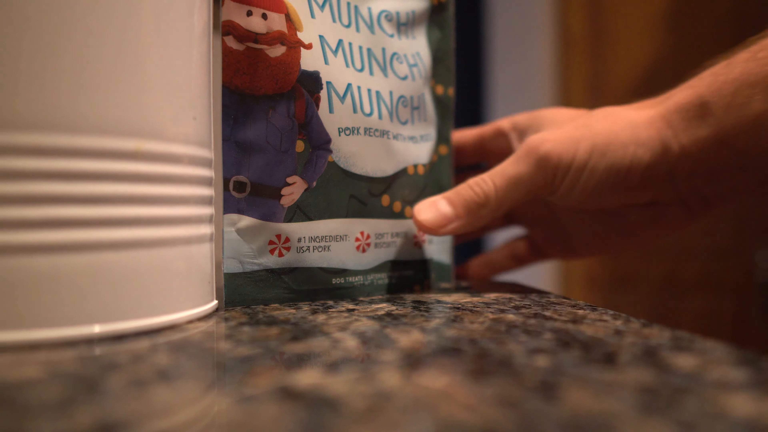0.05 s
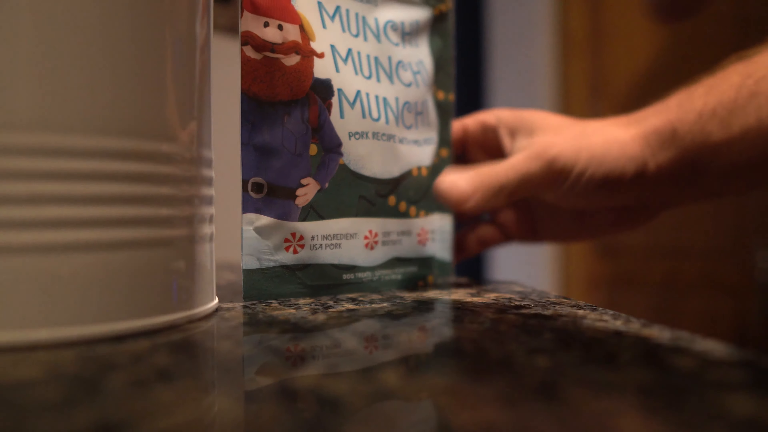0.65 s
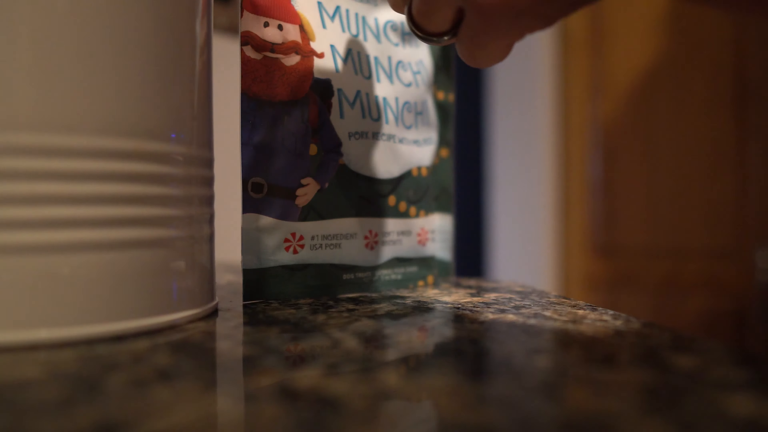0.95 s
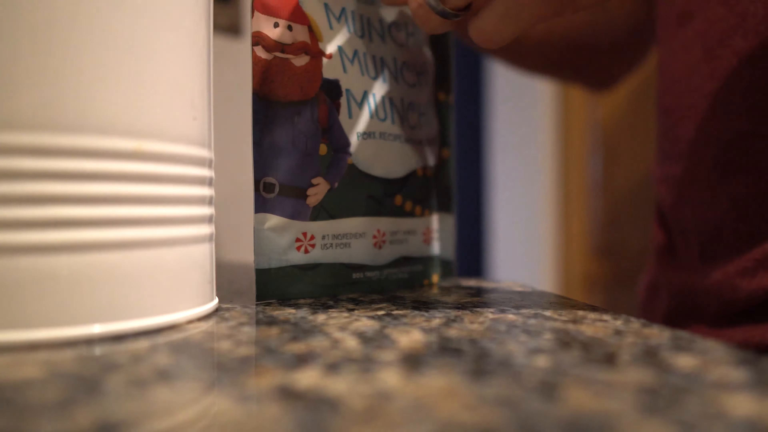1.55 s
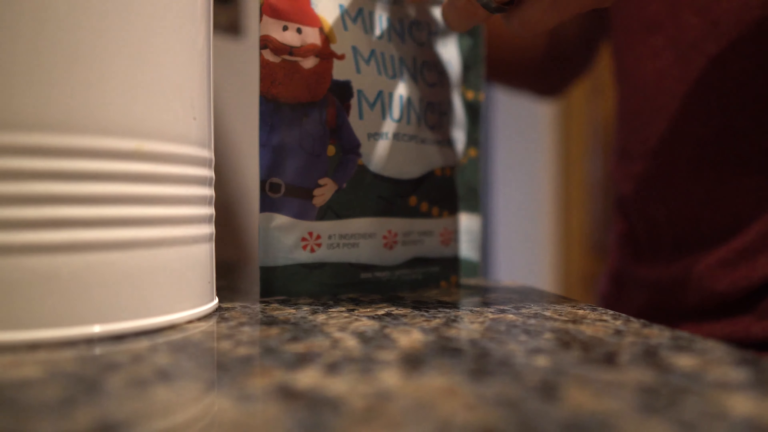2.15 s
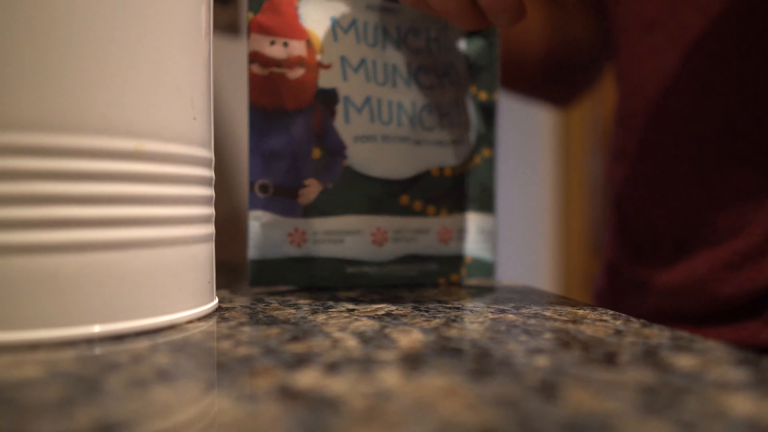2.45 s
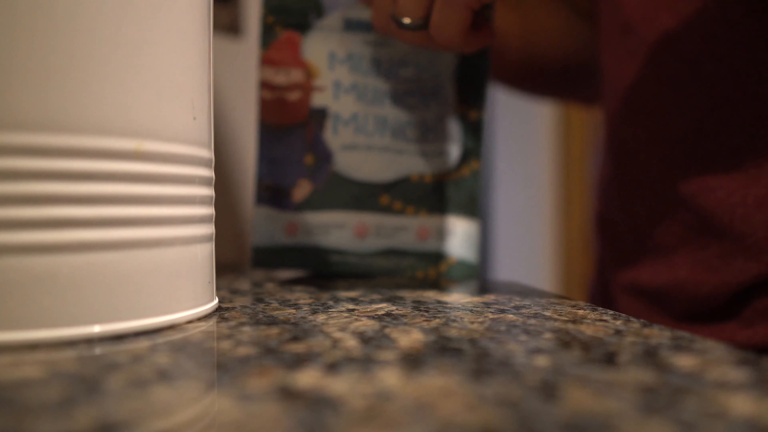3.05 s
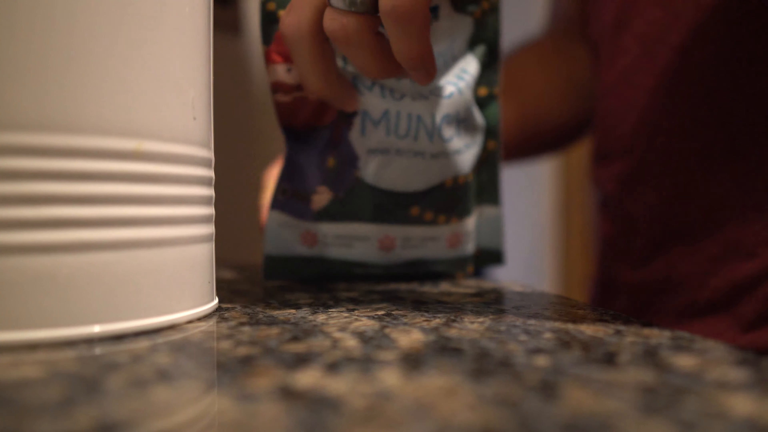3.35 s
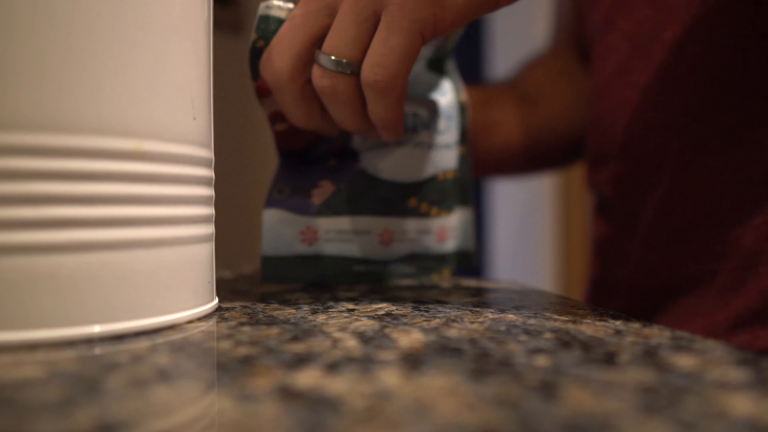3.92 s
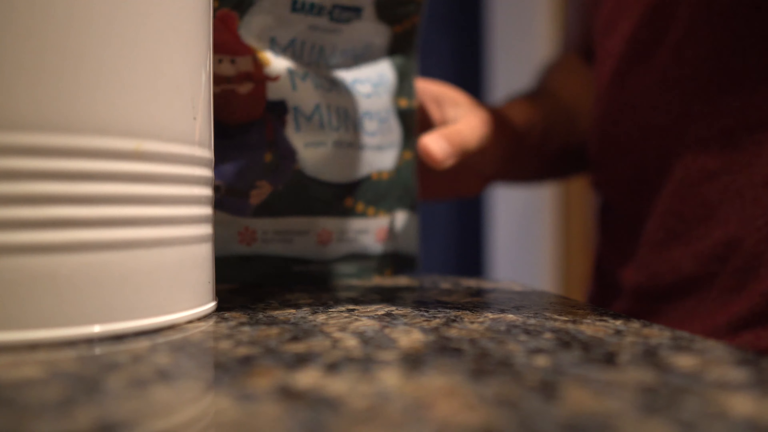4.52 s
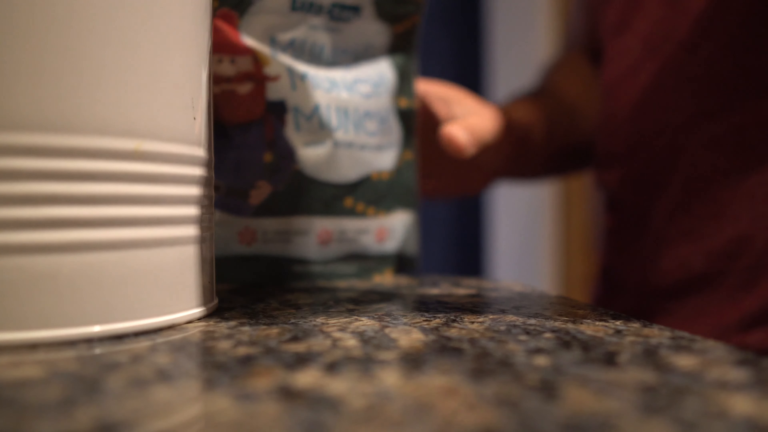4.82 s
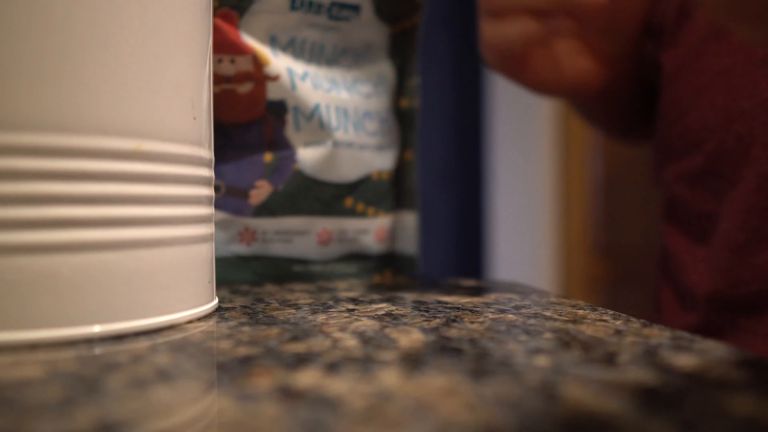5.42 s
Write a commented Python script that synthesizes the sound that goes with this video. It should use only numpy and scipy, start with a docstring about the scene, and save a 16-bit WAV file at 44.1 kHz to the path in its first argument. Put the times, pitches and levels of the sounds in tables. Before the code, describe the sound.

Close by, fingers grip a plastic pouch, which rustles and ticks lightly. The crinkling grows into irregular bursts with sharp pops as the bag is picked up and put down again, its contents bumping softly. It settles with a few dull knocks and a faint swish of cloth. The kitchen is quiet, with a short echo and a faint appliance hum.

```python
"""Crackling and sharp snaps of a stiff plastic treat pouch, gripped, lifted off a stone counter and
set down again in a quiet kitchen. The snaps are its panels buckling; between them fingers crumple
and rub the film, and the filled body bumps softly. A sleeve brushes past as the hand withdraws.
A short room tail follows the handling, over a faint appliance hum."""
import sys
import numpy as np
from scipy import signal
from scipy.fft import rfft, irfft
from scipy.io import wavfile
from scipy.ndimage import uniform_filter1d

SR = 44100
rng = np.random.default_rng(int(sys.argv[2]) if len(sys.argv) > 2 else 0)


def digitize_waveform(pressure):
    """Quantize a signal to 16-bit integers and store it at the path in sys.argv[1].

    Rows of a 2-D input are taken as channels; values are limited to [-1, 1].
    """
    field = np.atleast_2d(pressure).T
    bounded = np.clip(field, -1, 1)
    quanta = np.round(bounded * 32767).astype(np.int16)
    wavfile.write(sys.argv[1], SR, quanta)


N = 245894
TIME = np.arange(N) / SR

# Resonances of the film. Each row: pitch in Hz, level in dB, t60 in seconds.
FILM_MODES = [(723, -6.5, 0.054), (959, 0.5, 0.023), (1365, 1, 0.018), (1575, -1, 0.019), (2150, -1, 0.019),
              (2560, -2, 0.012)]
# Resonances of the filled pouch as a whole. Each row: pitch in Hz, level in dB, t60 in seconds.
BODY_MODES = [(167, -22, 0.062), (268, -4, 0.013), (433, 3, 0.018), (613, 1, 0.0076)]


def from_db(db):
    """Decibels to gain."""
    return 10 ** (np.asarray(db) / 20)


def rms_one(x):
    """Scale to rms 1."""
    return x / np.sqrt(np.mean(x ** 2) + 1e-20)


def unit_burst(x):
    """Scale a burst to the energy of 6 ms at rms 1."""
    return x / np.sqrt(np.sum(x ** 2) / (.006 * SR))


def level_out(x):
    """Even out the slow level, keep the grain."""
    local_power = np.maximum(uniform_filter1d(x ** 2, size=1300), 0)
    return x / np.sqrt(local_power + 0.083 * np.mean(x ** 2))


def add(track, start_s, sound):
    """Mix a sound into a track."""
    start = int(start_s * SR)
    track[start:start + len(sound)] += sound[:N - start]


def at_hz(points, hz):
    """Read a table on a log-frequency axis."""
    table = np.array(points)
    return np.interp(np.log(np.maximum(hz, 1)), np.log(table[:, 0]), table[:, 1])


def colour(x, spectrum):
    """Minimum-phase filter. Each spectrum row: frequency in Hz, gain in dB."""
    size = 8192
    gain = from_db(at_hz(spectrum, np.fft.rfftfreq(size, 1 / SR)))
    cepstrum = irfft(np.log(gain))
    cepstrum[1:size // 2] *= 2
    cepstrum[size // 2 + 1:] = 0
    return signal.fftconvolve(x, irfft(np.exp(rfft(cepstrum))))[:len(x)]


def low_pass(x, hz):
    """Two-pole low-pass."""
    return signal.sosfilt(signal.butter(2, hz, fs=SR, output="sos"), x)


def high_pass(x, hz):
    """Two-pole high-pass: a small sheet radiates little bass."""
    return signal.sosfilt(signal.butter(2, hz, "high", fs=SR, output="sos"), x)


def resonance(x, hz, q):
    """Two-pole band-pass."""
    return signal.lfilter(*signal.iirpeak(min(hz, SR / 3), q, fs=SR), x)


def ring(hz, t60_s, t):
    """Damped sine."""
    return np.sin(2 * np.pi * hz * t) * from_db(-60 * t / t60_s)


def strike(modes, t, spread_db):
    """One blow on a set of modes; where it lands sets the sign, strength and tension of each."""
    draws = rng.standard_normal((len(modes), 3))
    return sum(np.sign(side) * from_db(db + spread_db * strength)
               * ring(hz * np.exp(.04 * tension), t60_s, t)
               for (hz, db, t60_s), (side, strength, tension) in zip(modes, draws))


def drift(per_s):
    """Slow wander through unit-normal random points."""
    times_s = np.arange(0, N / SR + 1, 1 / per_s)
    return np.interp(TIME, times_s, rng.standard_normal(len(times_s)))


def clicks(per_s, spread_db):
    """Random impulses of uneven size and sign."""
    sizes = from_db(spread_db * np.minimum(rng.exponential(1, N), 4)) * rng.choice([-1, 1], N)
    return sizes * (rng.random(N) < per_s / SR)


def grit(per_s, grain_s):
    """Noise in tiny bursts: each slip starts at once and dies quickly."""
    slips = clicks(per_s, spread_db=3)
    power = signal.lfilter([1], [1, -np.exp(-1 / (grain_s * SR))], slips ** 2 + 1e-12)
    return np.sqrt(power) * rng.standard_normal(N)


def swell(peak_s, rise_s, fall_s):
    """Gain that climbs 20 dB per rise_s to 1, then drops 20 dB per fall_s."""
    away = np.maximum((peak_s - TIME) / rise_s, (TIME - peak_s) / fall_s)
    return from_db(-20 * np.minimum(away, 10))


def background(air_db=-60):
    """Still room air and a low, wavering appliance hum."""
    # Each row: frequency in Hz, gain in dB.
    air_spectrum = [(20, 0.5), (45, -10.5), (110, -15.5), (300, -18.5), (700, -21), (1500, -35),
                    (4000, -37), (9000, -42), (16000, -48)]
    # Each row: frequency in Hz, rms level in dB before the wavering.
    hum_partials = [(71.7, -64), (143.6, -69)]
    # Each row: time in seconds, gain in dB.
    hum_waver = [(0, -0.5), (1.2, 1), (2.3, 1), (2.6, -5.5), (5.58, -6)]
    hum = sum(from_db(db) * np.sqrt(2) * np.sin(2 * np.pi * (hz * TIME + rng.random()))
              for hz, db in hum_partials)
    air = from_db(air_db) * rms_one(colour(rng.standard_normal(N), air_spectrum))
    return air + hum * from_db(np.interp(TIME, *np.transpose(hum_waver)))


def kitchen_tail(x, first_echo_s=0.0034, build_s=0.002):
    """Diffuse tail: builds after the first reflection, lasts longest in the bass."""
    # Each row: frequency in Hz, tail energy in dB relative to the direct sound.
    tail_spectrum = [(100, -9.5), (400, -9.5), (1400, -18), (3000, -13), (6500, -8), (10000, -19.5),
                     (16000, -24.5)]
    # Each row: frequency in Hz, t60 in seconds.
    decay_times = [(100, 0.52), (1000, 0.31), (4000, 0.15), (8000, 0.23), (16000, .28)]
    t = TIME[:SR * 3 // 4]
    hz = np.fft.rfftfreq(len(t), 1 / SR)
    white, tail = rfft(rng.standard_normal(len(t))), 0
    onset = 1 - np.exp(-np.maximum(t - first_echo_s, 0) / build_s)
    for low_hz in 44 * 2. ** np.arange(9):
        octave = irfft(white * ((hz >= low_hz) & (hz < 2 * low_hz)), len(t))
        fade = onset * from_db(-60 * t / at_hz(decay_times, low_hz * np.sqrt(2)))
        tail += octave * fade / np.sqrt(np.sum(fade ** 2))
    return signal.fftconvolve(x, colour(tail, tail_spectrum))[:N]


def sleeve(level_db=-47.5):
    """Cloth fibres slide over each other in a short, dull swish."""
    # Each row: frequency in Hz, gain in dB.
    cloth_spectrum = [(200, -22), (480, -5), (620, 0.5), (900, 0), (1150, -11), (2000, -18), (8000, -48),
                      (16000, -58.5)]
    swish = rms_one(colour(rng.standard_normal(N), cloth_spectrum))
    return from_db(level_db) * swell(peak_s=5.2, rise_s=0.014, fall_s=0.15) * swish


def knocks(boom_hz=60, rise_s=0.0008, gain_db=-1):
    """The pouch shifts and settles: soft contacts stir low resonances over a deep boom."""
    # Each row: start in seconds, relative level in dB, main pitch in Hz, t60 in seconds,
    # boom in dB relative to the knock.
    contacts = [(.39, -35, 296, 0.068, -27), (0.681, -36.5, 263, 0.06, -10), (1.358, -44.5, 288, 0.12, -13),
                (2.223, -49.5, 110, .26, -13), (2.314, -33.5, 270, 0.056, -29),
                (2.455, -31, 275, 0.044, -39), (2.875, -31.5, 174, 0.061, -14), (2.96, -53, 170, 0.11, 7),
                (3.026, -38, 126, 0.13, -10), (3.105, -42, 117, 0.16, -21), (3.53, -37.5, 290, .17, -26),
                (4.012, -42.5, 134, 0.1, -3.5), (4.259, -39.5, 177, 0.092, -8), (4.384, -50, 127, 0.23, -4),
                (4.506, -57, 169.6, 0.26, 6.5), (4.71, -44, 280.5, 0.17, -12),
                (4.745, -44, 217.4, 0.23, -8.5), (4.785, -48, 195.3, 0.42, -5.5),
                (4.946, -47.5, 236, 0.26, -3), (4.979, -49, 166, 0.37, -4), (5.157, -54.5, 173, 0.66, -8)]
    # Each row of both: multiple of the main pitch, level in dB, share of the t60.
    knock_modes = [(.7, -7, 1), (1, -1, 1), (1.27, -3, .6), (1.7, -9, .5)]
    boom_modes = [(.6, -2, 1), (1, 0, 1), (1.45, -4, .8)]
    out, t = np.zeros(N), TIME[:SR // 2]
    onset = 1 - np.exp(-t / rise_s)

    def cluster(modes, hz, t60_s):
        return strike([(hz * ratio, db, t60_s * share) for ratio, db, share in modes], t, spread_db=1)

    for start_s, db, hz, t60_s, boom_db in contacts:
        knock = cluster(knock_modes, hz, t60_s)
        boom = from_db(boom_db) * cluster(boom_modes, boom_hz, t60_s)
        add(out, start_s, from_db(db + gain_db) * np.sqrt(2) * onset * (knock + boom))
    return out


def fingertip_sizzle(floor_db=-87, flutter_db=2.0):
    """Fingertips stick and slip on glossy film in very fine grains; taut film sounds brighter."""
    # Each row: middle in seconds, length in seconds, level in dB, film tautness from 0 to 1.
    slides = [(0.552, 0.23, -65.5, .8), (1.26, .16, -81, 0.25), (1.394, 0.3, -60, 0.12),
              (1.724, 0.12, -60, 0.12), (1.903, 0.24, -62, 0.06), (2.104, 0.038, -58.5, 0.1),
              (2.217, 0.08, -55.5, 0.03), (2.38, 0.23, -55.5, 0.14), (2.658, 0.044, -53.5, 0.3),
              (2.88, 0.057, -55.5, 0.4), (3.024, 0.02, -57, 0.8), (3.545, 0.051, -52.5, 0.8),
              (3.628, 0.077, -45.5, 0.7), (3.74, .08, -66, .7), (3.904, .05, -61.5, 1),
              (4.02, 0.082, -60, 1), (4.123, 0.081, -55, 0.3), (4.254, 0.063, -54.5, 0.8),
              (4.382, 0.19, -59, .5)]
    # Each row of both: frequency in Hz, gain in dB.
    slack_spectrum = [(3000, -36), (5500, -3.5), (6800, -4.5), (8100, 2.5), (9300, -12), (12000, -19),
                      (16000, -19.5)]
    taut_spectrum = [(3000, -31), (6000, -19), (8200, -3), (9500, 1), (11500, -2.5), (13500, -9.5),
                     (16000, -14)]
    slack_power, taut_power = from_db(floor_db) ** 2, 0
    for middle_s, length_s, db, tautness in slides:
        bell = np.exp(-np.minimum((2 * (TIME - middle_s) / length_s) ** 2, 20))
        power = from_db(db) ** 2 * bell
        slack_power += (1 - tautness) * power
        taut_power += tautness * power
    slack = level_out(colour(grit(per_s=700, grain_s=.0008), slack_spectrum))
    taut = level_out(colour(grit(per_s=1100, grain_s=.0008), taut_spectrum))
    flutter = from_db(flutter_db * drift(per_s=17))
    return flutter * (np.sqrt(slack_power) * slack + np.sqrt(taut_power) * taut)


def finger_effort():
    """Gains of crumpling, bumping and rubbing: the hold and the single moves add in power."""
    # Firmness of the hold. Each row: time in seconds, gain in dB.
    hold = [(0, -12.5), (.3, -9), (.6, 2.5), (.9, -15.5), (1.12, -20.5), (1.4, -0.5), (1.8, 0.5),
            (2.05, -0.5), (2.25, 1.5), (2.6, 2.5), (2.79, -11), (3.0, -1), (3.5, 1), (4.45, 7.5),
            (4.66, -27.5), (5.58, -10)]
    # Each row: peak time, rise and fall in seconds, then crumpling, bumping and rubbing in dB.
    moves = [(.07, 0.0017, .1, -46, -46.5, -52), (.136, 0.026, 0.12, -36.5, -42.5, -44.5),
             (0.239, 0.072, 0.1, -44, -60, -48), (0.393, 0.049, 0.027, -43.5, -51, -47.5),
             (.53, 0.21, 0.27, -54, -60, -60), (.69, 0.098, 0.081, -51, -49.5, -77),
             (0.788, 0.07, .14, -58, -59.5, -59.5), (1.3, .07, 0.12, -55.5, -53, -62),
             (1.365, 0.062, 0.12, -51.5, -64, -52), (1.529, 0.0089, 0.11, -41, -44, -47.5),
             (1.947, 0.023, 0.036, -39.5, -65, -59), (2.4, 0.17, 0.13, -51.5, -71, -58),
             (2.462, 0.03, 0.057, -29.5, -40.5, -43.5), (2.646, 0.069, 0.11, -46.5, -49, -49.5),
             (2.896, 0.069, .1, -45, -53, -48), (3.029, 0.024, .07, -42, -50, -51.5),
             (3.2, 0.25, 0.092, -53, -59, -55.5), (3.35, 0.043, 0.13, -45.5, -48.5, -60),
             (3.513, 0.049, 0.14, -35.5, -37.5, -45.5), (3.614, 0.1, 0.18, -37.5, -47, -40.5),
             (3.76, 0.079, 0.1, -40, -63, -52.5), (3.895, 0.037, 0.23, -44.5, -61, -50.5),
             (4.02, 0.04, 0.16, -38.5, -47, -53), (4.12, 0.097, 0.11, -41, -42.5, -47.5),
             (4.26, 0.092, 0.24, -39, -44.5, -50.5), (4.35, 0.14, .17, -47.5, -43.5, -60),
             (4.47, 0.078, .06, -53, -48.5, -58), (4.525, 0.018, 0.023, -37, -46.5, -50),
             (4.723, .02, .2, -55.5, -47.5, -68), (5.03, .07, 0.14, -62.5, -55, -70),
             (5.201, 0.062, 0.19, -59.5, -53.5, -62.5), (5.39, .15, 0.18, -69.5, -64, -65)]
    hold_gain = from_db(np.interp(TIME, *np.transpose(hold)))
    power = np.outer(from_db([-57.5, -61, -64.5]), hold_gain) ** 2
    for peak_s, rise_s, fall_s, *levels_db in moves:
        power += np.outer(from_db(levels_db), swell(peak_s, rise_s, fall_s)) ** 2
    return np.sqrt(power)


def crease_ticks(per_s=150, low_hz=2210, high_hz=7060, q=1.9):
    """Tiny creases give way at random, ticking at six pitches."""
    pitches_hz, out = np.geomspace(low_hz, high_hz, 6), np.zeros(N)
    for hz in pitches_hz:
        impulses = clicks(per_s / len(pitches_hz), spread_db=3)
        out += resonance(resonance(impulses, hz, q), hz, q) / np.sqrt(hz)
    return rms_one(out)


def crumple(modes, per_patch_s, spread_db, pitch_spread, load_db=4):
    """Tiny buckles in six differently tuned patches, each under a wandering load."""
    t, out = TIME[:SR // 20], np.zeros(N)
    for stretch in np.exp(pitch_spread * np.linspace(-1, 1, 6)):
        patch = strike([(hz * stretch, db, t60_s) for hz, db, t60_s in modes], t, spread_db=-0.5)
        buckles = clicks(per_patch_s, spread_db) * from_db(load_db * drift(per_s=13))
        out += signal.oaconvolve(buckles, patch)[:N]
    return out


def fingers(catch_db=-8, tick_db=-9, pressure_db=1.5):
    """Fingers crumple the film, bump the filled pouch and rub it, catching on tiny creases."""
    # Each row: frequency in Hz, gain in dB.
    rub_spectrum = [(1500, -11.5), (3000, 4.5), (4500, 1.5), (6200, -3), (8100, -2), (9300, -11.5),
                    (12000, -13), (16000, -26.5)]
    crumpling, bumping, rubbing = finger_effort()
    crackle = high_pass(crumple(FILM_MODES, per_patch_s=220, spread_db=3, pitch_spread=0.081), hz=554)
    bumps = high_pass(crumple(BODY_MODES, per_patch_s=70, spread_db=1, pitch_spread=0.3), hz=107)
    slide = level_out(colour(clicks(per_s=7000, spread_db=-1), rub_spectrum))
    catches = level_out(colour(grit(per_s=48, grain_s=0.0018), rub_spectrum))
    pressure = from_db(pressure_db * drift(per_s=25))
    rub = pressure * (slide + from_db(catch_db) * catches) + from_db(tick_db) * crease_ticks()
    return crumpling * level_out(crackle) + bumping * level_out(bumps) + rubbing * rub


def crease_crack(fold, level_db, ref_hz=8360, ref_db=-28, octaves_per_db=.035):
    """Bright crack of a crease, as a unit burst; a harder one is shorter and so higher."""
    # Each row: frequency in Hz, gain in dB.
    crack_spectrum = [(1500, -23), (2600, 6.5), (4200, 4), (6000, -1), (7400, 3.5), (9000, -0.5),
                      (11000, 2), (13000, 0.5), (16000, -3)]
    hz = ref_hz * 2 ** (octaves_per_db * (level_db - ref_db))
    blunted = low_pass(colour(fold, crack_spectrum), np.clip(0.95 * hz, 1000, .4 * SR))
    return unit_burst(resonance(blunted, hz, q=0.8))


def panel_snaps(panel_t60_s=0.012, film_db=-4, impulse_db=16, fold_t60_s=.011, soft_hz=3000):
    """A panel flips, rings briefly, shakes the pouch and cracks a crease. Returns direct, room feed."""
    # Each row: start in seconds, level in dB, panel pitch in Hz, then thud and crack in relative dB.
    snaps = [(0.3669, -42.5, 710, -5, -7), (0.3937, -39, 760, -19, -12), (0.3991, -39, 685, -7, -14),
             (0.5326, -43, 634, -20, -16), (0.6816, -34, 775, -5, -19), (0.6859, -34.5, 1560, -5, -14.5),
             (0.6877, -29, 970, -14, -19.5), (1.2725, -40, 1460, -28, -13), (1.372, -40.5, 2040, -9, -3),
             (1.3857, -41.5, 730, -10, -3), (1.8153, -42.5, 990, 0, -17), (1.9491, -53, 967, -4, -3.5),
             (2.2725, -44.5, 1130, -1.5, -28), (2.3042, -26, 1200, -28, -9.5), (2.3143, -33, 505, -9, -33),
             (2.3212, -32.5, 1090, -4, -13), (2.3777, -40.5, 1420, -27, -11), (2.4117, -40, 650, -1, -15),
             (2.4478, -32, 690, -1, -18), (2.4515, -26.5, 726, -8, -19), (2.4589, -26.5, 2340, -7, -11.5),
             (2.4635, -31.5, 788, 3, -25), (2.474, -29.5, 520, -16, -30), (2.4831, -29, 1370, -20, -5),
             (2.4885, -30, 510, -36, -7.5), (2.8739, -34.5, 490, -14, -10.5),
             (2.9024, -38.5, 530, -4.5, -0.5), (2.9477, -35, 1650, -13.5, -9),
             (2.9703, -42.5, 530, 2, -4.5), (3.0263, -39.5, 528, 2.5, -8),
             (3.0358, -40.5, 2270, -9.5, -5.5), (3.109, -15, 1484, -7.5, -8.5),
             (3.2144, -41, 966, -6.5, -17), (3.3137, -28, 2255, -8.5, -3),
             (3.379, -33.5, 1575, -11.5, -29.5), (3.421, -24.5, 563, -10, -31.5),
             (3.4552, -29.5, 1536, -12, -34.5), (3.499, -32.5, 564, -6, -15),
             (3.5046, -36, 1020, -14.5, -9), (3.5153, -28.5, 1597, -1, -26),
             (3.555, -15.5, 1516, -19.5, -38.5), (3.5795, -27, 1440, -10, -14.5),
             (3.596, -12.5, 1112, -29, -10), (3.6037, -32.5, 1100, -7, 0), (3.6069, -25.5, 675, -13, -13),
             (3.7553, -36.5, 1390, -28, -4), (3.7701, -48.5, 900, -13, 2), (3.7923, -27, 1410, -7.5, -33),
             (3.8846, -40, 1520, -8, -10.5), (4.0129, -30, 765, -0.5, -17),
             (4.0188, -29.5, 1580, -22, -12.5), (4.0804, -33, 1170, -29, -20),
             (4.1145, -33.5, 686, -3, -21), (4.1277, -26.5, 890, -5, -17), (4.2587, -35, 1050, -5, -9.5),
             (4.3859, -32.5, 740, -7.5, -37), (4.3987, -31.5, 960, -12, -6), (4.4738, -42.5, 1400, 0, -18),
             (4.5186, -39, 920, -5.5, -22), (4.7215, -65, 900, -4, 3.5)]
    direct, room_feed, t = np.zeros(N), np.zeros(N), TIME[:SR // 20]
    impulse = signal.unit_impulse(len(t))
    fold_fade = from_db(-60 * t / fold_t60_s)
    for start_s, db, hz, thud_db, crack_db in snaps:
        film = from_db(film_db) * unit_burst(strike(FILM_MODES, t, spread_db=2.5))
        panel = unit_burst(ring(hz, panel_t60_s, t)) + film
        body = low_pass(strike(BODY_MODES, t, spread_db=8), soft_hz)
        thud = from_db(thud_db) * unit_burst(high_pass(body, hz=330))
        rough_fold = from_db(impulse_db) * impulse + rng.standard_normal(len(t)) * fold_fade
        # Peaks and notches even out over all directions, so the room gets a smoother snap.
        smooth_panel = resonance(impulse, hz, q=4.4)
        for track, flip, fold in ((direct, panel, rough_fold), (room_feed, smooth_panel, impulse)):
            pop = unit_burst(high_pass(low_pass(flip, soft_hz), hz=540))
            crack = from_db(crack_db) * crease_crack(fold, db + crack_db)
            add(track, start_s, from_db(db) * (pop + thud + crack))
    return direct, room_feed


def scene():
    """The pouch close by, the kitchen around it; mono."""
    snaps, room_feed = panel_snaps()
    handling = fingers() + fingertip_sizzle() + knocks() + sleeve()
    return (snaps + handling + kitchen_tail(room_feed + handling) + background())[None]


def record(dry):
    """Steep treble cut at 15950 Hz."""
    return signal.sosfilt(signal.ellip(10, .1, 70, 15950, fs=SR, output="sos"), dry)


dry = scene()
out = record(dry)
digitize_waveform(out)
```